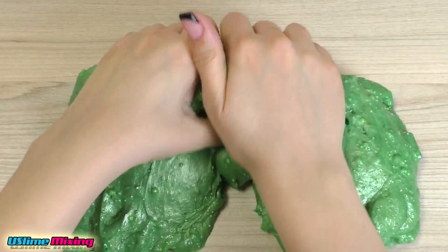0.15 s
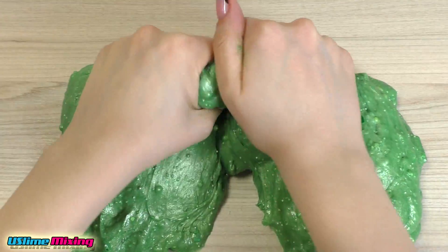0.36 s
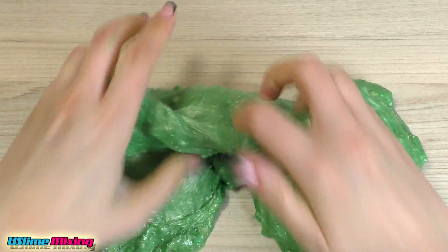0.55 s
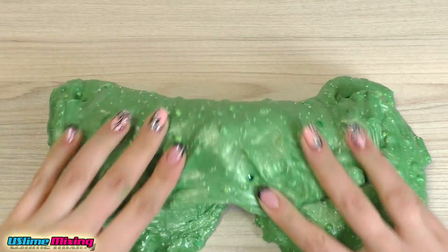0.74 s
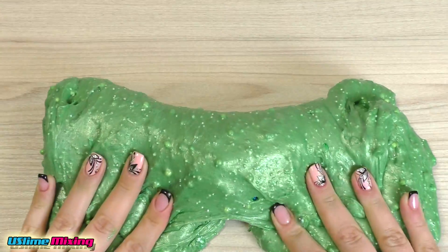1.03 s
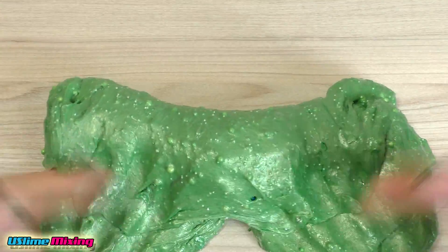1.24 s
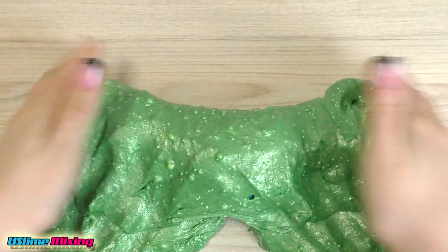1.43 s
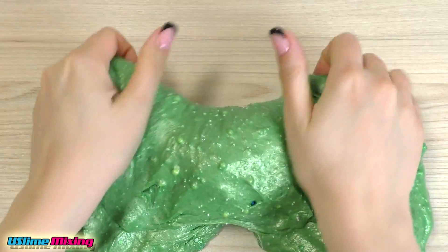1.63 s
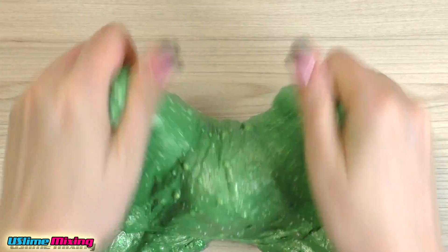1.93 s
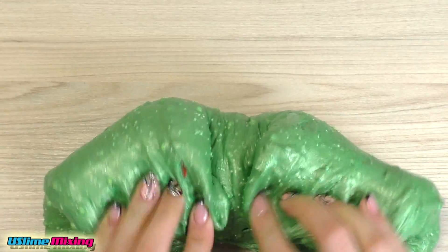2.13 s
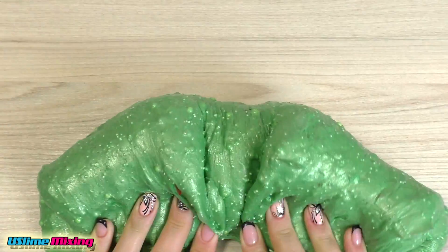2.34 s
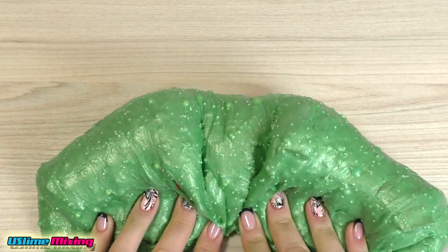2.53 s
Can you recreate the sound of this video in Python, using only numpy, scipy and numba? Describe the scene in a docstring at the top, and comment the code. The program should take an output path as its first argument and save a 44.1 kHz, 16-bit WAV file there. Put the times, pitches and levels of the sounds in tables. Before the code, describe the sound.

Thick slime kneaded by hand up close, with wet pops, crisp crackles and soft squishes in bursts

```python
"""Hands knead thick beaded slime on a wooden table close by, in stereo, with a short room tail.
From 0 s: hum and hiss (shaped noise), faint crackle (tiny damped sines), a soft thud (two table modes).
From 0.2 s: air pockets pop (damped sines in stages) as crackle swells; 0.3 s: folds squeak (gliding
harmonics); 0.38 s: air hisses out after big pops (fading noise bands). A lull near 1 s, a short flurry
with a last squeak near 1.28 s, then pops, crackle and thuds from 1.5 s to the end."""
import sys
import numpy as np
from scipy import signal
from scipy.fft import rfft, irfft
from scipy.io import wavfile
from scipy.ndimage import uniform_filter1d
from numba import njit

SR = 44100
rng = np.random.default_rng(int(sys.argv[2]) if len(sys.argv) > 2 else 0)


def waveform_to_disk(signal):
    """Save audio, clipped to [-1, 1], as 16-bit WAV at the path in sys.argv[1]."""
    frames = np.transpose(np.atleast_2d(signal))
    scaled = np.clip(frames, -1, 1) * 32767
    samples = np.round(scaled).astype(np.int16)
    wavfile.write(sys.argv[1], SR, samples)


N = 119070
T = np.arange(N) / SR

# Hum bands: f/Hz, width/Hz, level/dB
HUM_BANDS = [(160.9, 13, -71.5), (126.9, 14, -72.5), (310, 130, -78.5), (35.2, 26, -81.5), (77.5, 110, -76)]
# Hiss spectrum: f/Hz, relative level/dB
HISS_SPECTRUM = [(120, -59), (200, -13), (299, -7.5), (340, -16.5), (387, -12), (601, -29), (763, -21),
                 (2750, -20), (4600, -35.5), (16000, -38.5)]
# Kneading effort: t/s, fine crackle level/dB, coarse crackle level/dB, squelch level/dB
KNEADING = [(0, -76.5, -62, -69), (.18, -76, -75.5, -76.5), (.222, -50, -41.5, -45), (.28, -60, -50, -41.5),
            (.32, -40.5, -34.5, -43.5), (0.371, -36, -40, -106), (.41, -54, -56.5, -70),
            (0.526, -57, -57.5, -62), (0.561, -43.5, -44, -53.5), (.6, -39, -41, -52),
            (.65, -41, -38, -48.5), (.69, -49.5, -54, -62), (.77, -68, -63, -68), (.8, -54.5, -56.5, -70),
            (.84, -52, -58, -65), (.88, -64, -66, -77), (1.199, -82, -83, -87.5), (1.23, -69.5, -68, -79),
            (1.26, -42, -43, -58), (1.301, -39.5, -41.5, -55), (1.33, -52, -49.5, -55),
            (1.39, -85.5, -74, -68.5), (1.54, -85, -90.5, -86.5), (1.581, -63, -63.5, -83),
            (1.72, -61, -57, -65.5), (1.758, -50, -51.5, -65.5), (1.87, -51.5, -49, -57),
            (1.93, -45, -50, -58), (2.02, -34, -43.5, -41.5), (2.081, -42, -43.5, -51.5),
            (2.131, -56, -64, -66.5), (2.35, -63.5, -56.5, -68.5), (2.39, -83, -57, -60),
            (2.448, -73, -41, -42.5), (2.52, -70, -64, -61.5), (2.6, -73.5, -75, -84),
            (2.66, -64, -57, -81), (2.7, -50, -50, -46.5)]
# Crisp crackle: t/s, level re fine crackle/dB
CRISP_RE_FINE = [(0, 1), (.25, -10), (.33, 4), (.42, -2), (.6, -3), (.82, -9), (1.28, -7), (1.6, 0.5),
                 (1.78, -2.5), (1.97, -4.5), (2.15, -7), (2.4, -7), (2.7, -8)]
# Table thuds: t/s, level/dB, rise/s, upper mode re lower/dB
TABLE_THUDS = [(0.031, -66, 0.041, 7), (0.212, -47, 0.016, 10), (0.577, -52.5, 0.033, -11),
               (0.657, -54.5, 0.041, -3), (1.262, -63, .02, 3), (1.532, -58.5, 0.01, -4),
               (1.68, -52, 0.016, -10), (1.797, -64.5, 0.015, 12.5), (1.989, -45, 0.012, -3.5),
               (2.367, -39.5, 0.036, -26)]
# Bursting pockets: t/s, level/dB, pocket f/Hz, film f/Hz, then re level: thump/dB, pocket/dB, snap/dB,
# film/dB; left re right/dB, pocket ring to -30 dB/cycles, noise share in film/0-1
POCKET_POPS = [(0.2, -34, 2730, 14200, -23, 2, -26, -3, 2, 4.2, 0.64),
               (0.222, -13.5, 617, 10750, -3, -3, -40, -21.5, 0.7, 4.45, 0.86),
               (0.318, -9.5, 2330, 6430, -49, 1.5, -10.5, -34, 2, 3.8, 0.95),
               (0.3466, -8, 2060, 8650, -33.5, -3.5, -11.5, -5.5, 0.5, 3.5, 0.19),
               (0.349, -20, 1090, 8540, -44, -11.5, -18, 3.5, -0.84, 5.9, 0.68),
               (0.379, -4, 1950, 8700, -20, -5, -21, 0, 0.64, 4.5, 0.55),
               (0.3793, -11, 1250, 12500, -30, 0, -30, 0, 0.64, 3.5, 0.7),
               (0.474, -25.5, 1050, 8930, -26.5, -13, -14.5, -7, 2.2, 10.5, 0.26),
               (0.551, -25, 2940, 8650, -29, 5, -9, -24, 3, 4.5, 0.75),
               (0.594, -24, 3000, 8060, -27, 6, -28, -4.5, 1, 5.3, 0.22),
               (0.63, -19, 970, 13600, -34, -48, -30, 4.5, 3, 5.0, 0.65),
               (0.642, -18, 2700, 13700, -20, -1, -35, -7, 1.1, 5.9, 0.75),
               (0.794, -39.5, 2130, 12000, -22, -18, -35, -2, -1, 5.0, 0.91),
               (0.976, -43.5, 1930, 11300, -33.5, -16, -19, -5.5, 4, 4.3, 0.64),
               (1.255, -24, 797, 9530, -41.5, -21, -16, -10.5, -3.4, 8, 0.65),
               (1.285, -19, 2300, 12230, -21, -6, -19, -5, -1.5, 5.3, 0.58),
               (1.562, -28.5, 1570, 8570, -34, -19, -15.5, -5.5, 4, 5.4, 0.47),
               (1.655, -28, 2640, 10200, -28, -2.5, -35, -21, 3.5, 5.6, 0.54),
               (1.745, -10, 2420, 6600, -44, 0, -11.5, -12.5, 2.7, 3.9, 0.94),
               (1.852, -30, 1150, 12100, -32, -4, -34, -18, 2, 7, 0.9),
               (1.838, -26, 1274, 12300, -39, -12.5, -34, -4, 5, 5.5, 0.86),
               (1.876, -24, 1120, 13500, -37, -15, -23, -3, 9, 4, 0.42),
               (1.891, -16, 1071, 9300, -35, -16.5, -7, -1.5, -2, 20.8, 0.61),
               (1.909, -6, 1030, 12600, -49, -36, -17.5, 1.5, 5, 4.3, 0.58),
               (1.964, -18.5, 1060, 9900, -32, -47, -29, -4, 3, 3.6, 0.41),
               (2.012, -11, 2150, 12400, -37, -35, -19, -8, 1.5, 17, 0.2),
               (2.021, -13, 2510, 10600, -26, -22, -33, -0.5, 2.5, 9, 0.61),
               (2.048, -19.5, 2000, 11200, -28, -8.5, -16, -0.5, 4.5, 5.1, 0.59),
               (2.092, -18.5, 1140, 8560, -27.5, -36, -38, -9.5, 1.5, 7.9, 0.82),
               (2.19, -21.5, 2060, 9850, -54, -20, -18, -4, -3.5, 7.4, 0.7),
               (2.283, -23.5, 1980, 11630, -55, -30, -53, -6, -1.2, 6.5, 0.63),
               (2.37, -6, 1252, 7940, -40, -2.5, -31, -46, -3.5, 4.9, 0.81),
               (2.4375, -24, 1600, 5500, -25, -3, -20, -14, -2.4, 6, 0.5),
               (2.436, -17.5, 930, 9500, -29, 0.5, -26, -21.5, -3, 3.4, 0.44),
               (2.484, -25.5, 2700, 11670, -19, -5, -16.5, -11.5, 1, 5.1, 0.67),
               (2.572, -38, 1200, 8900, -41, -24, -15.5, -8.5, 2.1, 4.6, 0.53),
               (2.618, -20.5, 2240, 10900, -34.5, -4, -34, -24.5, -3, 2.97, 0.59),
               (2.668, -38, 990, 12800, -16.5, -11, -18, -1, -1, 5.0, 0.54)]
# Air squeezed from folds: t/s, length/s, start f/Hz, end f/Hz, level/dB, overtones/dB, swell share/0-1
FOLD_SQUEAKS = [(.290, .025, 330, 300, -39, -25, .5), (.301, .017, 3400, 2650, -28, -30, .2),
                (.322, .025, 1830, 1750, -37, -2, .9), (1.284, .054, 322, 306, -39, -26, .5)]
# Air hissing out after the biggest pops: t/s, f/Hz, width/Hz, level/dB, t60/s
AIR_LEAKS = [(0.384, 8850, 1100, -39, 0.6), (0.384, 6900, 350, -51, 0.7), (0.384, 5950, 400, -51, 0.7),
             (1.75, 6660, 3030, -41.5, 0.34), (1.914, 11800, 2500, -35, 0.16), (2.373, 1290, 420, -35, 0.4),
             (2.376, 4600, 500, -57, 0.5)]
# Dips from sound mirrored by the table top: f/Hz, width/Hz, share removed/0-1
MIRROR_DIPS = [(785, 330, 0.49), (3415, 200, 0.4), (7500, 200, 0.3)]

HISS_DB, SIDE_DB = -69.5, -4.5
LOWER_MODE_HZ, UPPER_MODE_HZ, TABLE_T60_S = 120, 158, .24
THUMP_HZ, SNAP_HZ = 338.5, 4437
THUMP_CYCLES, SNAP_CYCLES, FILM_CYCLES = 2.06, 15.6, 21.8  # to fade by 30 dB
POP_RISE_S, CREST_DB, SNAP_NOISE_SHARE = 0.00099, 11.5, 0.66
STAGE_S, STAGE_JITTER_S = .002, .0005  # a pocket bursts in three quick stages
FILM_STAGES_DB, POCKET_STAGES_DB, THUMP_STAGES_DB = (-4, 0, -7), (0, -8, -14), (0, -12, -20)
ROOM_T60_S, ROOM_DB, ROOM_RISE_S = .34, -17, .003
TOP_HZ = 15900


def undb(db):
    """Amplitude ratio from dB."""
    return 10 ** (np.asarray(db) / 20)


def level(x, db):
    """Scale to an RMS level in dB."""
    return x * undb(db) / np.sqrt(np.mean(x ** 2))


def walk(rate_hz):
    """Slow random drift, spread near 1."""
    k = int(SR / rate_hz)
    steps = np.repeat(rng.standard_normal(N // k + 1), k)
    return 1.1 * uniform_filter1d(uniform_filter1d(steps, k), k)[:N]


def curve(rows, column):
    """Interpolate a table column over time."""
    rows = np.array(rows)
    return np.interp(T, rows[:, 0], rows[:, column])


def above(x, hz):
    """Small sources radiate no bass."""
    return signal.sosfilt(signal.butter(3, hz, "high", fs=SR, output="sos"), x)


@njit
def grains(at, hz, cycles, size, pan, rise, rough, noise, n, sr):
    """Damped sines with a short rise, partly roughened by noise, placed between left and right."""
    out = np.zeros((2, n))
    for g in range(len(at)):
        fade = np.log(31.6) * hz[g] / cycles[g] / sr  # 30 dB in the given cycles
        start = int(at[g])
        turn = np.exp(2j * np.pi * hz[g] / sr - fade)
        z = size[g] + 0j
        for i in range(start, min(n, start + int(5 / fade))):
            onset = np.sin(np.pi / 2 * min(1., (i - start) / rise[g])) ** 2
            v = z.imag * onset * (1 - rough[g] + rough[g] * noise[i])
            out[0, i] += v * pan[g]
            out[1, i] += v / pan[g]
            z *= turn
    return out


def background():
    """Wavering hum bands over a wide, soft hiss: spectrally shaped noise."""
    f = np.arange(N // 2 + 1) * SR / N + 1  # 1 Hz up keeps the log finite

    def mid_side(gain):
        return irfft(rfft(rng.standard_normal((2, N))) * gain, N)

    hiss = np.array(HISS_SPECTRUM)
    hiss_gain = undb(np.interp(np.log(f), np.log(hiss[:, 0]), hiss[:, 1]))
    out = level(mid_side(hiss_gain), HISS_DB) * undb(1.6 * walk(3))
    for hz, width_hz, db in HUM_BANDS:
        band_gain = 1 / (1 + ((f - hz) / width_hz * 2) ** 2)
        out = out + level(mid_side(band_gain), db) * undb(2 * walk(7.3))
    mid, side = out
    return mid + undb(SIDE_DB) * side * np.array([[1], [-1]])


def crackle(db, rate_hz, lo_hz, hi_hz, cycles, spread_db):
    """Dense tiny damped bursts of scattered pitch and size, following the kneading effort."""
    draws = rng.random((30000, 6))[:int(rate_hz * N / SR)]
    when, pitch, rarity, ring, sign, side = draws.T
    size = undb(-spread_db * np.log(1 - rarity)) * np.sign(sign - .5)  # few are loud
    hz = lo_hz + (hi_hz - lo_hz) * pitch
    ring_cycles = cycles * (.5 + 2 * ring ** 2)
    pan = undb(7.4 * (side - .5))
    one_cycle = SR / hz
    x = grains(when * N, hz, ring_cycles, size, pan, one_cycle, 0 * hz, T, N, SR)  # no roughness
    return level(above(x, lo_hz * 1.113), 0) * undb(db + 3.65 * walk(45.12))


def thuds():
    """Soft pushes ring two modes of the table top."""
    out = np.zeros(N)
    for s, db, rise_s, upper_db in TABLE_THUDS:
        t = np.maximum(T - s, 0)
        lower = np.sin(2 * np.pi * (LOWER_MODE_HZ * t + rng.random()))
        upper = np.sin(2 * np.pi * (UPPER_MODE_HZ * t + rng.random()))
        fade_db = -60 * np.maximum(t - rise_s, 0) / TABLE_T60_S
        out += undb(db + fade_db) * np.minimum(t / rise_s, 1) * (lower + undb(upper_db) * upper)
    return out


def pops():
    """Each bursting pocket rings low, at its own pitch, and in the film, which tears in stages."""
    (s, pop_db, pocket_hz, film_hz, thump_db, pocket_db, snap_db, film_db,
     pan_db, pocket_cycles, film_noise) = np.array(POCKET_POPS, float).T
    one, out = np.ones(len(s)), 0
    jitter = STAGE_JITTER_S * rng.standard_normal((len(s), len(FILM_STAGES_DB))).T
    # Parts: f/Hz, ring/cycles, level/dB, noise share, noise low-pass/Hz, high-pass/Hz, stages/dB
    parts = (
        (THUMP_HZ * one, THUMP_CYCLES, thump_db, .15, 300, 100, THUMP_STAGES_DB),
        (pocket_hz, pocket_cycles, pocket_db, .35, 1000, 500, POCKET_STAGES_DB),
        (SNAP_HZ * one, SNAP_CYCLES, snap_db, SNAP_NOISE_SHARE, 1800, 2500, FILM_STAGES_DB),
        (film_hz, FILM_CYCLES, film_db, film_noise, 3500, 4500, FILM_STAGES_DB))
    for hz, cycles, db, rough, noise_hz, cut_hz, stages_db in parts:
        lowpass = signal.butter(2, noise_hz, fs=SR, output="sos")
        noise = level(signal.sosfilt(lowpass, rng.standard_normal(N)), 0)

        def each(v):
            return np.tile(v * one, len(stages_db))

        at = np.concatenate([s + k * (STAGE_S + jitter[k]) for k in range(len(stages_db))]) * SR
        size = undb(each(pop_db + db + CREST_DB) + np.repeat(stages_db, len(s)))
        rings = grains(at, each(hz), each(cycles), size, each(undb(pan_db / 2)),
                       each(POP_RISE_S * SR), each(np.clip(rough, 0, 1)), noise, N, SR)
        out = out + above(rings, cut_hz)
    return out


def squeaks():
    """Air through a fold: short gliding tones with overtones, swelling then fading."""
    out = np.zeros(N)
    for s, length_s, start_hz, end_hz, db, over_db, swell in FOLD_SQUEAKS:
        u = np.clip((T - s) / length_s, 0, 1)
        glide_hz = start_hz + (end_hz - start_hz) * (1 - (1 - u) ** 5)
        phase = 2 * np.pi * np.cumsum(glide_hz * (1 + .025 * walk(500))) / SR
        overtones = np.sin(2 * phase) + np.sin(3 * phase) + np.sin(4 * phase) / 2
        tone = np.sin(phase) + undb(over_db) * overtones
        envelope = np.interp(u, [0, np.clip(swell, .02, .98), 1], [0, 2, 0])
        out += undb(db + 3.3 * walk(250)) * envelope * tone
    return out


def leaks():
    """Escaping air: a band of noise that fades after a burst."""
    out = np.zeros(N)
    for s, hz, width_hz, db, t60_s in AIR_LEAKS:
        edges_hz = [hz - width_hz / 2, hz + width_hz / 2]
        band = signal.butter(1, edges_hz, "band", fs=SR, output="sos")
        hiss = level(signal.sosfilt(band, rng.standard_normal(N)), db)
        fade_db = -60 * np.maximum(T - s, 0) / t60_s
        out += hiss * (T > s) * undb(fade_db + 2 * walk(140))
    return out


def hollow(x):
    """Narrow dips where direct and mirrored sound cancel."""
    for hz, width_hz, share in MIRROR_DIPS:
        x = x - np.clip(share, 0, 1) * signal.lfilter(*signal.iirpeak(hz, hz / width_hz, SR), x)
    return x


def room(x):
    """Short stereo tail: the mono sum convolved with decaying noise."""
    t = T[:SR // 2]
    mid, side = rng.standard_normal((2, len(t)))
    tail = mid + 0.44 * side * np.array([[1], [-1]])
    tail = tail * undb(-60 * t / ROOM_T60_S) * np.minimum(t / ROOM_RISE_S, 1)
    tail = tail * undb(ROOM_DB) / np.sqrt(np.sum(tail ** 2) / 2)
    return signal.fftconvolve(x.mean(axis=0)[None], tail, axes=1)[:, :N]


def scene():
    """Slime sounds with their room tail, over table thuds and background."""
    fine_db = curve(KNEADING, column=1)
    crisp_db = fine_db + curve(CRISP_RE_FINE, column=1)
    coarse_db, squelch_db = curve(KNEADING, column=2), curve(KNEADING, column=3)
    slime = pops() + leaks()
    slime += crackle(coarse_db, rate_hz=4000, lo_hz=700, hi_hz=3300, cycles=5.5, spread_db=2.2)
    slime += crackle(squelch_db, rate_hz=700, lo_hz=240, hi_hz=520, cycles=5., spread_db=1.5)
    slime += crackle(fine_db, rate_hz=9000, lo_hz=7500, hi_hz=15800, cycles=7., spread_db=2.5)
    slime += crackle(crisp_db, rate_hz=6000, lo_hz=3300, hi_hz=7500, cycles=5.5, spread_db=2.2)
    slime = hollow(slime) + squeaks()
    return slime + room(slime) + thuds() + background()


def record(dry):
    """The recorder cuts the top: a steep low-pass, applied twice."""
    cut = signal.ellip(8, .2, 60, TOP_HZ, fs=SR, output="sos")
    return signal.sosfilt(cut, signal.sosfilt(cut, dry))


dry = scene()
out = record(dry)
waveform_to_disk(out)
```